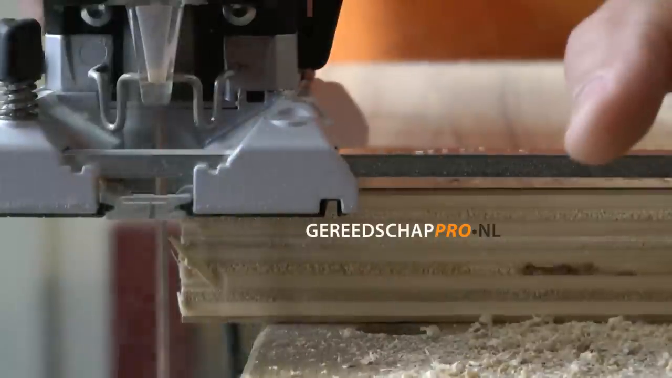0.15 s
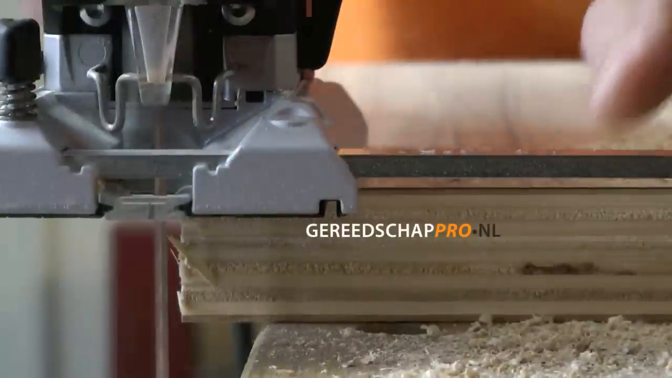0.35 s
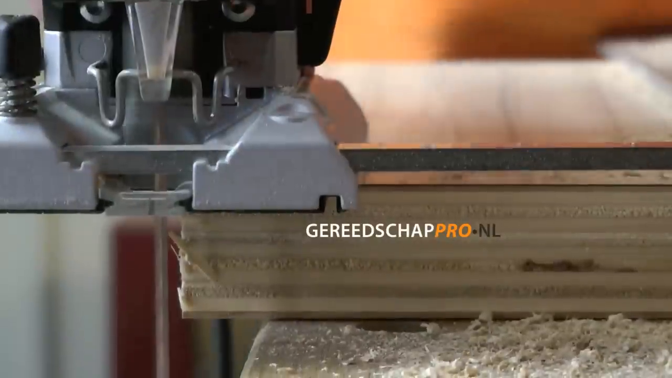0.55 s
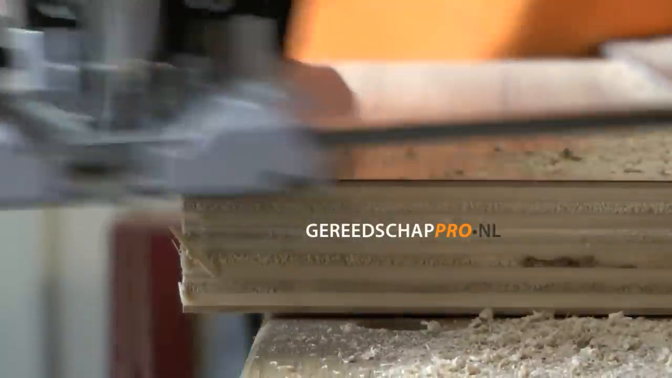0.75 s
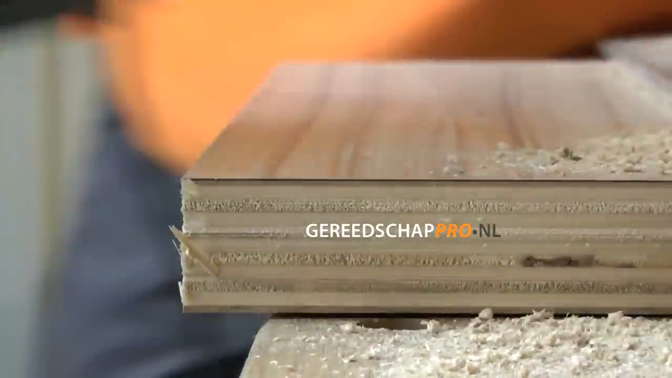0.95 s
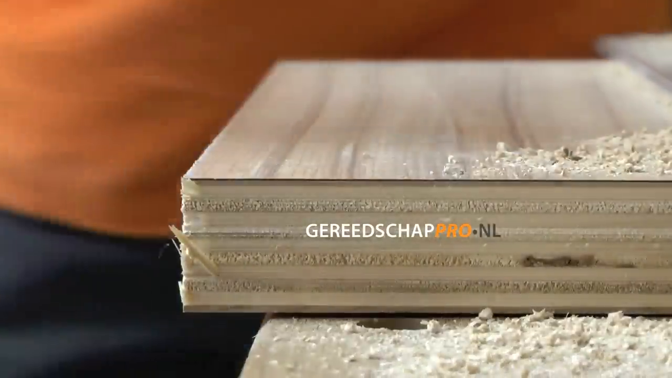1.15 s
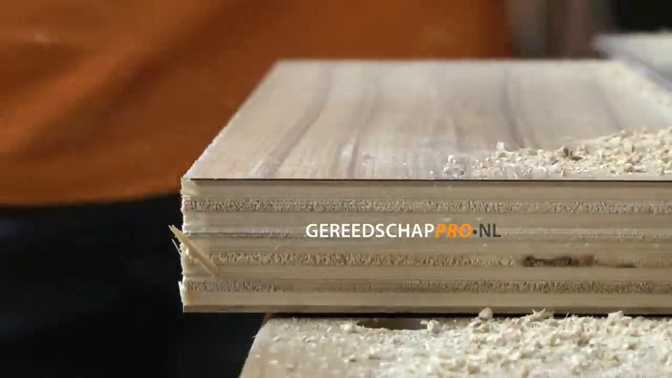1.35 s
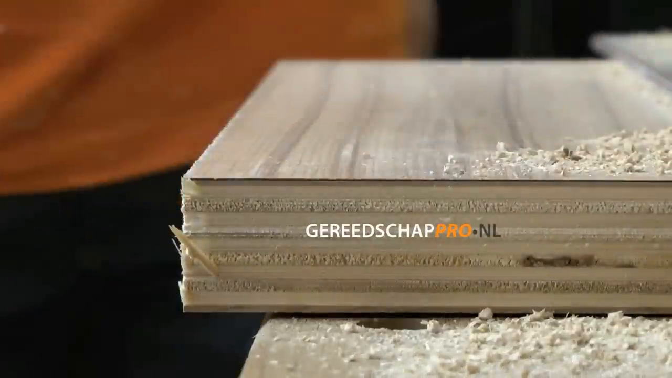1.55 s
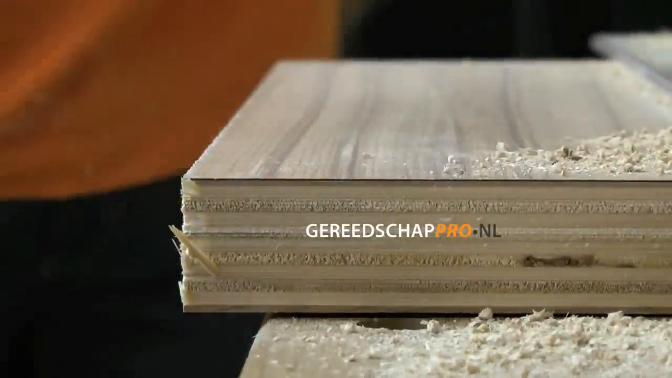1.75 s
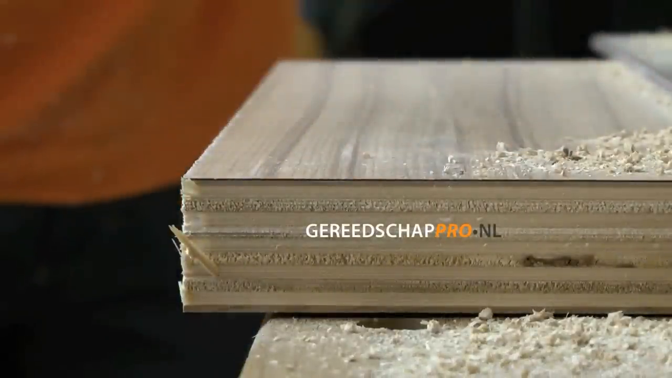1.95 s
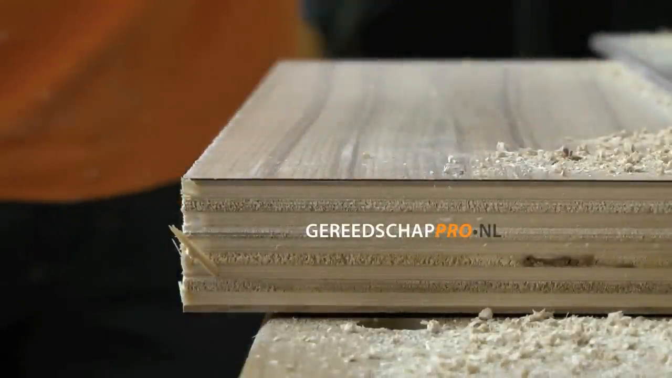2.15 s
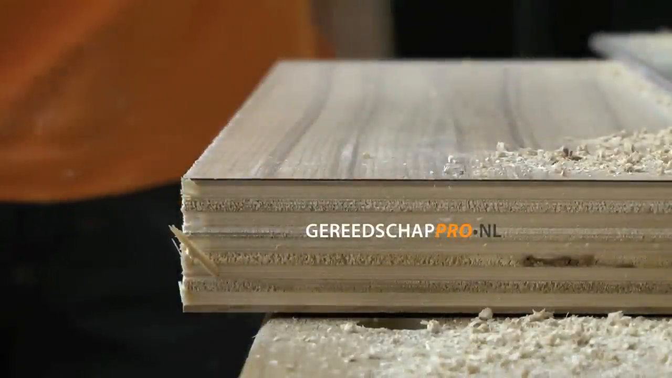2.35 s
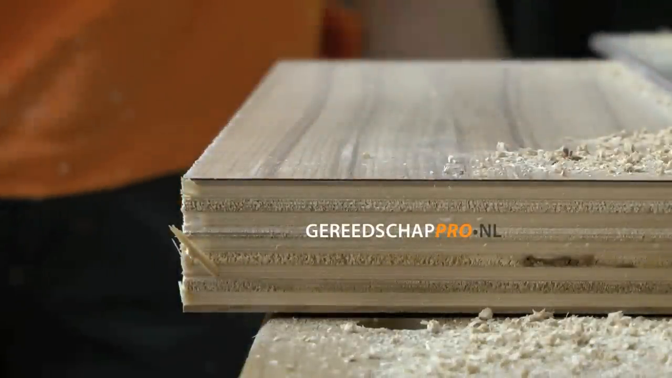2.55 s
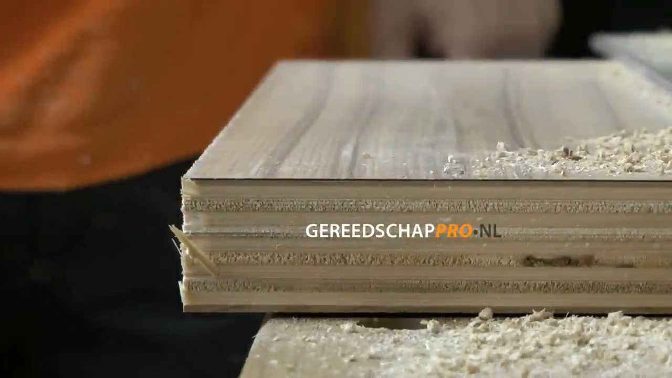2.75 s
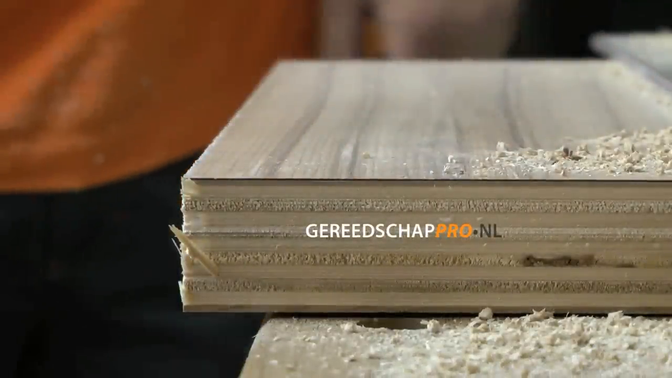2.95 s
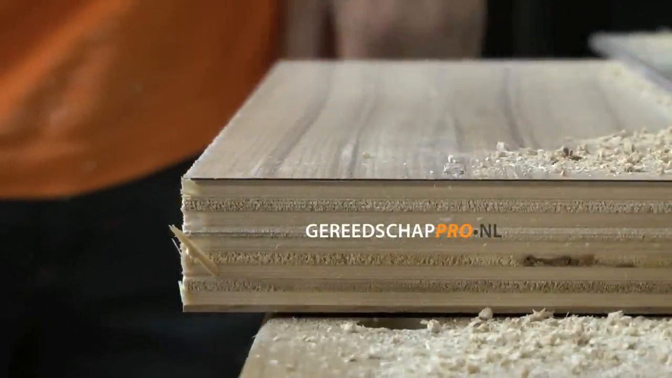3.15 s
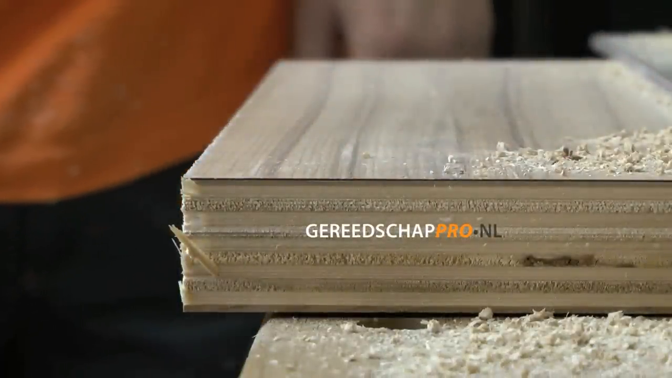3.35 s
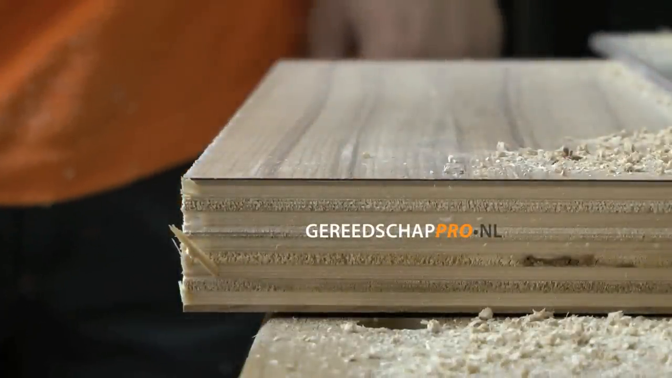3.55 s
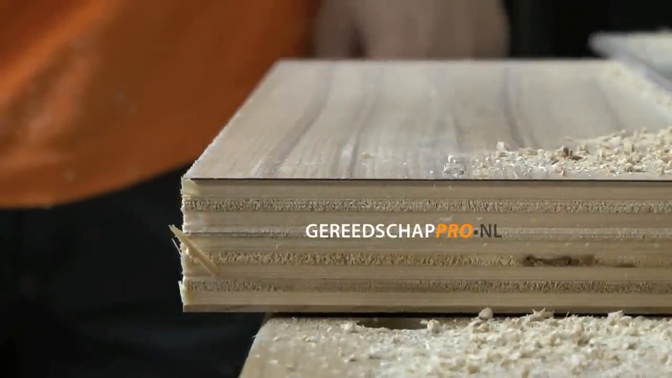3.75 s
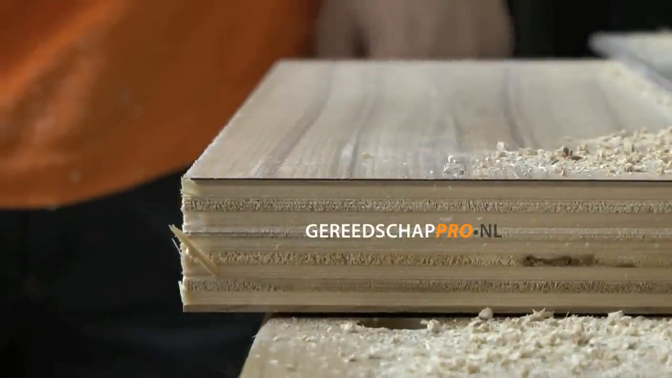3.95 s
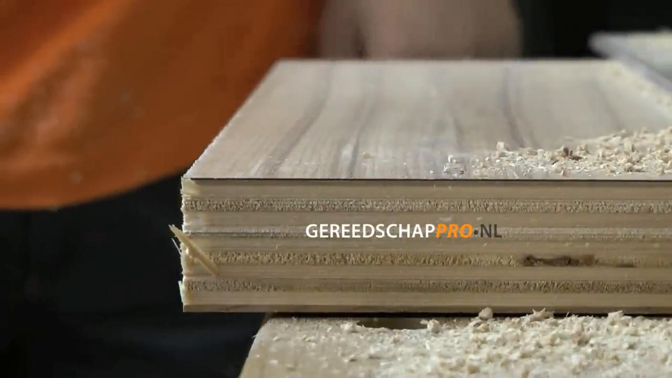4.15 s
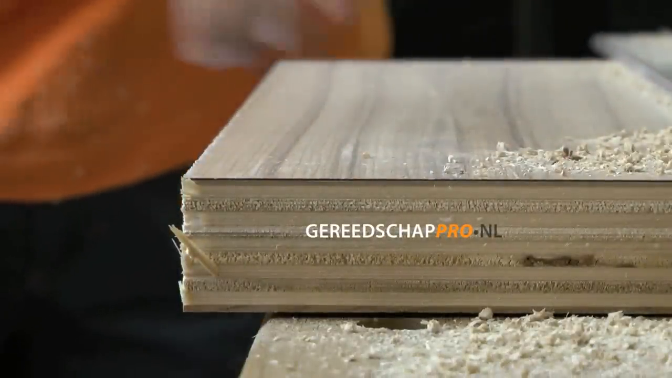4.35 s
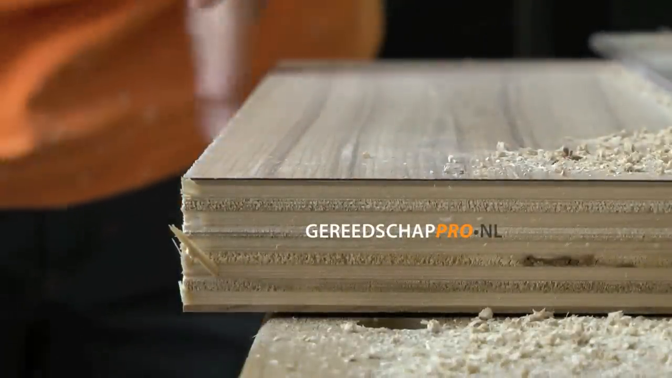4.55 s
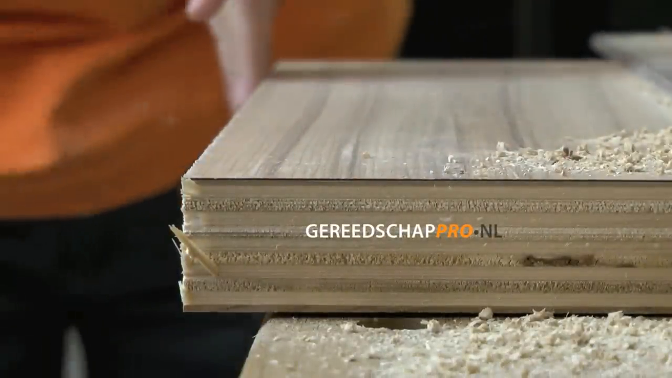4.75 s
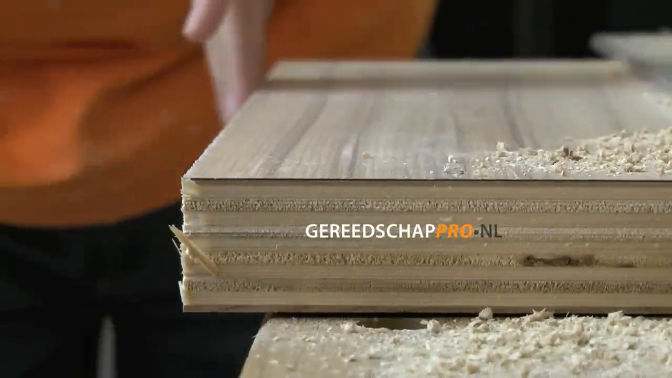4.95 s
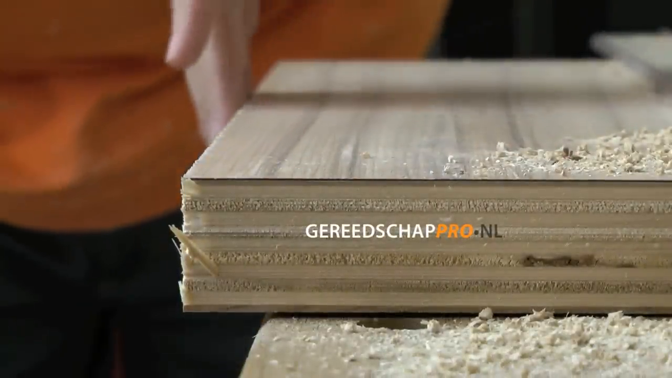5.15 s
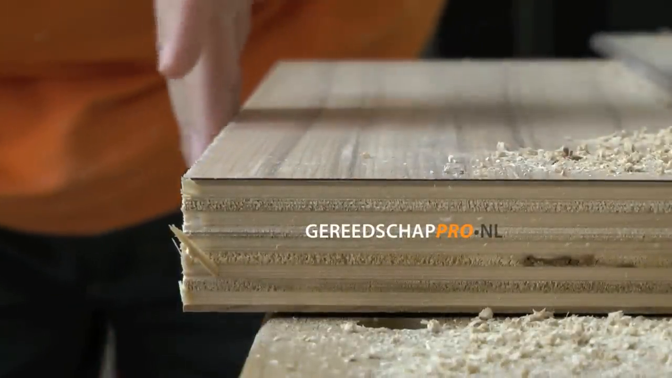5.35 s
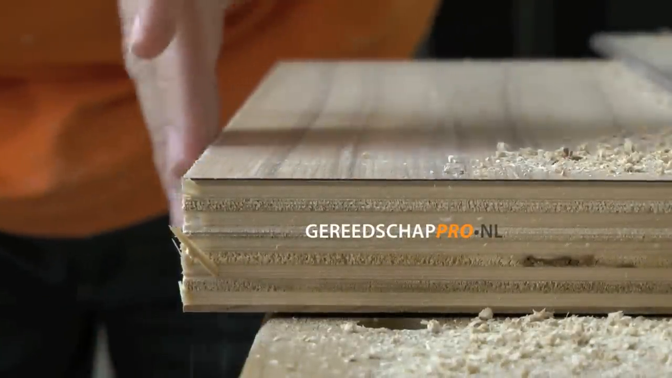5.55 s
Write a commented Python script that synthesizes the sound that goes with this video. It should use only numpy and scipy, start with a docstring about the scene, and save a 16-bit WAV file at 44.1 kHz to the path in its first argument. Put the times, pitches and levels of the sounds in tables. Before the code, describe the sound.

Close jigsaw cutting ends in a sharp clack, the motor coasts down in falling pitch, then quiet hum and soft hand rubbing on a board.

```python
"""A jigsaw, close up, tears out of a cut in thick plywood, knocks against the board and coasts to a stop.
Its gear whines as wandering tones, the blade rod rattles as noise surging twice a stroke, brushes hiss;
air drag and friction slow it, so pitch and level sink together. The knock is noise and struck modes.
It ducks the recorder's gain, which creeps back up over steady hum, rumble and hiss.
Late on, fingers slide over the board: dense tiny slips, shaped by the pressure of the hand."""
import sys
import numpy as np
from scipy import signal
from scipy.fft import rfft, irfft
from scipy.io import wavfile
from scipy.ndimage import uniform_filter1d

SR = 44100
rng = np.random.default_rng(int(sys.argv[2]) if len(sys.argv) > 2 else 0)


def master(y):
    """Save y as 16-bit WAV."""
    cut = np.clip(np.atleast_2d(y).T, -1, 1)
    pcm = np.round(cut * 32767)  # scale
    wavfile.write(sys.argv[1], SR, pcm.astype(np.int16))


N = 246959
TIME = np.arange(N) / SR  # s

# All source levels stand ahead of the room and the recorder's gain control.
# Run-down: strokes/s at the start, time constant of air drag in s, strokes/s lost each second to dry friction
FULL_SPEED, DRAG_S, FRICTION = 52.5, 1.78, 5.15
GEAR_TEETH = 52

# Tone of the torn fibres, relative: [f/Hz, level/dB]
CUT_COLOUR = [(100, -49.5), (250, -30.5), (380, -27.5), (460, -19.5), (700, -11), (1050, -8), (1400, -10),
              (2000, -12.5), (2500, -2), (3500, -9), (5200, -11), (7300, -18), (11000, -30), (15500, -45)]
# Resonances of board and shoe under the blade, added to that outline: [f/Hz, width/Hz, level/dB re outline]
BOARD_RING = [(448, 26, 11), (548, 15, -2), (866, 38, -1.5), (1130, 30, -1), (1828, 150, 3),
              (2320, 220, -10)]
CUT_DB, CUT_ENDS_S, CUT_RELEASE_DB_PER_S = -2, .35, 92.5

# Broad tone of the free-running saw, relative: [f/Hz, level/dB]
COAST_COLOUR = [(120, -34.5), (300, -19), (530, -13), (844, -7), (1100, -6.5), (1320, -8.5), (1600, -4),
                (2400, -0.5), (3300, -5), (4000, -7.5), (6600, -11), (9000, -20.5), (12000, -29.5),
                (13000, -35), (15500, -42.5)]
# Resonances of housing and gear case, added to that outline: [f/Hz, width/Hz, level/dB re outline]
HOUSING_RING = [(705, 50, -10), (915, 110, -4), (1190, 80, -2), (1640, 100, -3), (2130, 70, -4),
                (2400, 160, -9), (3100, 260, -5), (4600, 500, -9), (7000, 500, -10)]
# Rattle level at the starting speed, and its loss when the speed falls to a tenth
RATTLE_DB, RATTLE_DB_PER_DECADE = -4, 30
DRONE_DB, HISS_DB, SHAKE_DB = -9, -6, -26  # dB re rattle
HISS_DB_PER_DECADE = -0.5  # negative: the hiss gains slightly on the rattle as the speed falls
LAST_STROKE_S, SETTLE_S = 2.954, 0.3  # the shaking fades out over SETTLE_S from here

# How well the gear case radiates a tone, before the loss per harmonic: [f/Hz, level/dB re rattle]
WHINE_COLOUR = [(550, -22), (720, -9), (900, -7.5), (1130, -5.5), (1330, -20), (1640, -7.5), (1950, -6),
                (2450, -8), (3000, -16), (5000, -22)]
HARMONIC_DB = -6  # times the harmonic number, so the fundamental takes it once and the octave twice

# Resonances of board and housing as the slowing saw passes them: [t/s at the height, f/Hz, level/dB re rattle]
SWELLS = [(.15, 203, -39), (.61, 207, -29), (.63, 458, -28), (.71, 870, -13), (.81, 3200, -7),
          (1.95, 205, -30), (2.0, 335, -24), (2.684, 3200, -4), (2.93, 1700, -6), (3.06, 2120, -1)]
SWELL_HALF_S, SWELL_WIDTH = 0.093, .07  # half length to 1/e; flutter rate as a share of the frequency

# The saw knocks on the board: [t/s, crack level/dB, thump level/dB]
KNOCKS = [(0.3688, 7, -2), (0.372, 8, -21)]
# Tone of the crack, relative: [f/Hz, level/dB]
CRACK_COLOUR = [(200, -18), (900, -6.0), (1800, 12.0), (4000, 7.5),
                (7500, -4.5), (11000, -27.0), (15500, -14)]
# Modes of the steel shoe, nominal, re crack before its trim: [f/Hz, level/dB, t60/s]
SHOE_MODES = [(1850, -6, .05), (2850, -7, 0.39), (2756, -5.5, 0.24), (3080, -4.5, 0.038),
              (4910, -11, 0.031)]
# Modes of the thump, nominal, re thump: a deep sub-bass lobe, then the board's modes: [f/Hz, level/dB, t60/s]
THUMP_MODES = [(14, -3, 0.33), (118, -20.5, 0.33), (207, -8.5, 0.22), (282.6, -13.5, 0.11),
               (320, 0.5, 0.14), (447.7, -12.5, 0.18)]

# The slowing blade rod drops through its play, before the tick and tone trims: [t/s, level/dB]
CLACKS = [(2.4507, -25), (2.467, -18.5), (2.6418, -23), (3.0148, -29), (3.038, -38), (3.058, -37)]
# Modes of the rod, nominal, re clack: [f/Hz, level/dB, t60/s]
ROD_MODES = [(980, -6, 0.13), (1593, -1.5, 0.078), (1990, 10, 0.023), (2130, -6, 0.17), (2340, -20, 0.092),
             (2930, -3, 0.076), (3330, -17, .08)]
BOUNCE_S, BOUNCE_DB = .0063, -2.5  # each rebound of the rod: delay and level step

# Tone of skin on wood, relative: [f/Hz, level/dB]
RUB_COLOUR = [(260, -26), (450, -5.5), (600, -3), (780, -7), (950, -9), (1100, -5), (1500, -6), (2350, -2),
              (4000, -5), (6200, -7), (9000, -16), (14000, -23.5)]
# The hand slides over the board: [start t/s, length/s, level/dB at the start]
SLIDES = [(3.424, .24, -66.5), (4.011, .1, -72), (4.37, .2, -63.5), (4.64, 0.1, -51.5), (4.895, 0.68, -52)]
SLIDE_ATTACK_S, SLIDE_RELEASE_S, SLIDE_SAG_DB_PER_S = 0.11, 0.13, 6.5  # attack and release to 1/e
# A pressed fingertip scuffs the board: [t/s at the height, level/dB, friction resonance f/Hz]
SCUFFS = [(4.625, -56, 1700), (4.713, -51, 2490), (4.918, -52, 2544)]
SCUFF_HALF_S = 0.04  # half length to 1/e
# Fingers touch down: [t/s, level/dB, centre f/Hz]
TOUCHES = [(4.319, -55, 1270), (4.32, -61, 3990), (4.637, -46.5, 3800), (4.903, -49, 3700)]

# Mains and idling machines, each level wandering slightly: [f/Hz, rms level/dB]
HUM = [(50, -67.5), (70.4, -61), (93, -68), (95.5, -62), (150, -60.5), (200, -66.5), (250, -68),
       (281.3, -62.5), (300, -74.5), (329.3, -70.5), (450, -75), (550, -79.5), (755, -80), (850, -81),
       (1050, -80)]
# Tone of the faint steady hiss, relative: [f/Hz, level/dB]
AIR_COLOUR = [(250, -20), (400, -4.5), (800, -2), (1500, -2.5), (4000, -9.5), (15500, -12)]
AIR_DB, RUMBLE_DB = -65, -63.5

# Gain control: threshold, deepest cut, cut at the start, recovery rate, smoothing time
AGC_THRESHOLD_DB, AGC_RANGE_DB, AGC_START_DB = -10, 17, 16.5
AGC_RECOVERY_DB_PER_S, AGC_ATTACK_S = 17, 0.00404
TOP_HZ = 15750  # upper edge of the recorder's passband


def run_down():
    """Strokes per second of a motor braked by air drag and dry friction."""
    offset = FRICTION * DRAG_S
    return np.maximum((FULL_SPEED + offset) * np.exp(-TIME / DRAG_S) - offset, 1)


def strokes(turns, sharp, scatter_db, return_db):
    """A surge at each reversal of the blade; return strokes are weaker and sizes scatter."""
    half = (2 * turns).astype(int)
    scatter = scatter_db * rng.standard_normal(1024)[half]
    size = undb(scatter + return_db * (half % 2))
    return size * np.exp(-sharp * (2 * turns % 1))


def cutting(turns):
    """Teeth tear fibres in surges and ring the board, until the blade leaves the wood."""
    surge = 3.2 + strokes(turns, sharp=1.5, scatter_db=1.5, return_db=-0.5)
    tearing = (grains(9000, 1.6) + 0.75 * noise()) * surge
    level_db = CUT_DB - CUT_RELEASE_DB_PER_S * np.maximum(TIME - CUT_ENDS_S, 0)
    return unit(colour(tearing, CUT_COLOUR, BOARD_RING)) * undb(level_db)


def shaking(speed):
    """Strength of the saw's vibration: a power of its speed, until the rod settles."""
    moving = np.clip(1 - (TIME - LAST_STROKE_S) / SETTLE_S, 0, 1) ** 2
    return undb(RATTLE_DB + RATTLE_DB_PER_DECADE * np.log10(speed / FULL_SPEED)) * moving


def coasting(turns, speed):
    """Loose gear teeth and the blade rod rattle the housing; brushes hiss, duller as the motor slows."""
    surge = 1 + .9 * strokes(turns, sharp=2.5, scatter_db=1.5, return_db=-2)
    mesh = 1 + .5 * np.cos(2 * np.pi * GEAR_TEETH * turns)  # impacts bunch at each tooth
    impacts = unit((grains(8000, 2.6) + .8 * noise()) * surge * mesh)
    body = colour(impacts, COAST_COLOUR, HOUSING_RING)
    drone = unit(band(body, 480, 1364)) * undb(DRONE_DB)
    rattle = unit(band(body, 1330, 4000))
    shake = unit(band(body, 210, 544)) * undb(SHAKE_DB)

    brushes = colour(noise(), COAST_COLOUR, HOUSING_RING)  # they slide evenly, whatever the stroke
    bright_hiss = unit(band(body + 1.2 * brushes, 4000, 20000))
    soft_hiss = signal.sosfiltfilt(signal.butter(3, 9000, fs=SR, output="sos"), bright_hiss)
    dull = np.interp(speed, [3, 14], [.5, 0])
    hiss_db = HISS_DB + HISS_DB_PER_DECADE * np.log10(speed / FULL_SPEED)
    hiss = ((1 - dull) * bright_hiss + dull * soft_hiss) * undb(hiss_db)

    free = np.clip((TIME - CUT_ENDS_S) / .08, 0, 1)  # the blade is out of the wood
    return (drone + rattle + hiss + shake) * free


def whine(turns, speed):
    """Gear mesh and octave sink through case resonances; backlash spreads them, strokes wobble them."""
    phase = 2 * np.pi * GEAR_TEETH * turns + 0.7 * np.sin(4 * np.pi * turns)
    hz, db = np.transpose(WHINE_COLOUR)
    out = np.zeros(N)
    for k in (1, 2):
        tone_hz = k * GEAR_TEETH * speed
        radiated_db = np.interp(np.log(tone_hz), np.log(hz), db) + k * HARMONIC_DB
        out += flutter(k * phase, width_hz=130, steady=1.4) * undb(radiated_db)
    return out


def swells():
    """Resonances swell briefly as the shaking sweeps past them."""
    out = np.zeros(N)
    for s, hz, db in SWELLS:
        tone = flutter(2 * np.pi * hz * TIME, SWELL_WIDTH * hz, steady=0.63)
        out += undb(db) * bump(s, SWELL_HALF_S) * tone
    return out


def knocks():
    """The steel shoe cracks against the board and rings; the board thumps."""
    burst = sum(undb(db) * fade(s, 0.034) for s, db, _ in KNOCKS)
    crack = unit(colour(noise(), CRACK_COLOUR)) * burst
    shoe = undb(-5.5) * strike([(s, db) for s, db, _ in KNOCKS], SHOE_MODES)
    sizzle = unit(band(noise(), 3100, 8200)) * undb(4.5) * fade(KNOCKS[0][0], 0.19)
    thump = strike([(s, db) for s, _, db in KNOCKS], THUMP_MODES)
    return crack + shoe + sizzle + thump


def clacks(count=3):
    """The rod's metallic knocks in the last slow strokes, each with quick, weaker rebounds."""
    blows = [(s + k * BOUNCE_S, db + k * BOUNCE_DB) for s, db in CLACKS for k in range(count)]
    burst = sum(undb(db) * fade(s, 0.029) for s, db in blows)
    tick = unit(band(noise(), 640, 3100)) * burst
    tone = undb(-13) * strike(blows, ROD_MODES)
    return band(tone + undb(-6.5) * tick, 750, 9600)


def pressure(start, length):
    """One slide of the hand: it presses, slowly eases and lifts."""
    age = TIME - start
    edges = np.minimum(age, 0) / SLIDE_ATTACK_S - np.maximum(age - length, 0) / SLIDE_RELEASE_S
    return np.exp(edges) * undb(-SLIDE_SAG_DB_PER_S * np.clip(age, 0, length))


def hand():
    """Skin catches on dusty wood in tiny slips; a pressed fingertip scuffs; landings tick."""
    slips = grains(4000, 3.9) + 0.62 * noise()
    # where slides overlap, the stronger one is heard
    press = np.max([undb(db) * pressure(s, length) for s, length, db in SLIDES], axis=0)
    out = unit(colour(slips, RUB_COLOUR)) * press
    for s, db, hz in SCUFFS:
        scuff = flutter(2 * np.pi * hz * TIME, width_hz=1700, steady=0)
        out += scuff * undb(db) * bump(s, SCUFF_HALF_S)
    for s, db, hz in TOUCHES:
        out += unit(ring(slips, hz, 0.14 * hz)) * undb(db) * fade(s, 0.07)
    return out


def room(x, wet_db, t60):
    """Short diffuse echo of bench and walls: a decaying noise tail."""
    tail = (band(noise(), 230, 7000, order=1) * fade(0.0027, t60))[:SR]
    tail = tail / np.sqrt(np.sum(tail ** 2))
    return x + undb(wet_db) * signal.fftconvolve(x, tail)[:N]


def workshop():
    """Steady hum of sine tones over a low noise rumble and faint hiss."""
    hum = np.zeros(N)
    for hz, db in HUM:
        tone = np.sqrt(2) * np.sin(2 * np.pi * (hz * TIME + rng.random()))
        hum += undb(db + 0.35 * walk(3)) * tone
    rumble = unit(band(noise(), 60, 290)) * undb(RUMBLE_DB)
    air = unit(colour(noise(), AIR_COLOUR)) * undb(AIR_DB)
    return hum + rumble + air


def undb(db):
    """Decibels to gain."""
    return 10 ** (np.asarray(db) / 20)


def unit(x):
    """Scale to rms 1."""
    return x / np.sqrt(np.mean(x ** 2))


def noise():
    """White noise."""
    return rng.standard_normal(N)


def walk(rate):
    """Random wander: straight lines between rate new values a second, spread near 1."""
    steps = rng.standard_normal(16384)
    return np.interp(TIME * rate, np.arange(len(steps)), steps)


def grains(rate, spread_db):
    """Dense random impacts, about rate a second, of uneven size and either sign; rms 1."""
    hits = rng.random(N) < rate / SR
    return unit(hits * rng.choice([-1, 1], N) * undb(spread_db * noise()))


def flutter(phase, width_hz, steady):
    """A tone whose strength and phase wander, spreading it into a band; rms 1."""
    wander = steady + walk(width_hz) + 1j * walk(width_hz)
    return unit(np.real(wander * np.exp(1j * phase)))


def strike(blows, modes):
    """Blows (t/s, level/dB) ring a set of decaying modes, slightly detuned each time."""
    out, t = np.zeros(N), TIME[:SR // 2]
    for s, blow_db in blows:
        detune = 1 + 0.017 * rng.standard_normal(len(modes))
        start = int(s * SR)
        for (hz, db, t60), k in zip(modes, detune):
            decay = np.exp(-np.log(1000) * t / t60)
            out[start:start + len(t)] += undb(db + blow_db) * np.sin(2 * np.pi * hz * k * t) * decay
    return out


def fade(start, t60):
    """Exponential decay from a given moment."""
    age = TIME - start
    return (age >= 0) * np.exp(-np.log(1000) * np.clip(age / t60, 0, 10))


def bump(s, half):
    """Smooth rise and fall around a moment."""
    return np.exp(-((TIME - s) / half) ** 2)


def band(x, lo_hz, hi_hz, order=3):
    """Band-pass."""
    edges = [lo_hz, min(hi_hz, SR / 2 - 1)]
    return signal.sosfilt(signal.butter(order, edges, "band", fs=SR, output="sos"), x)


def ring(x, hz, width):
    """One resonance, gain 1 at its centre."""
    return signal.lfilter(*signal.iirpeak(hz, hz / width, fs=SR), x)


def colour(x, points, peaks=(), size=8192):
    """Minimum-phase filter: a broad (f/Hz, level/dB) outline with resonances standing on it."""
    f = np.maximum(np.arange(size // 2 + 1) * SR / size, 1)
    hz, db = np.transpose(points)
    gain = undb(np.interp(np.log(f), np.log(hz), db))
    gain = gain * (1 + sum(undb(d) / (1 + (2 * (f - c) / w) ** 2) for c, w, d in peaks))
    cepstrum = irfft(np.log(gain))[:size // 2]
    cepstrum[1:] *= 2  # folding the cepstrum makes the filter causal
    return signal.fftconvolve(x, irfft(np.exp(rfft(cepstrum, size))))[:N]


def gain_control(x, size=128):
    """Peaks over the threshold turn the gain down fast; it creeps back at a steady rate."""
    level_db = 10 * np.log10(np.abs(uniform_filter1d(x ** 2, size)) + 1e-12)
    asked_db = np.clip(level_db - AGC_THRESHOLD_DB, 0, AGC_RANGE_DB)
    recovery_db = AGC_RECOVERY_DB_PER_S * TIME
    held_db = np.maximum.accumulate(np.maximum(asked_db + recovery_db, AGC_START_DB), axis=-1)
    cut_db = held_db - recovery_db
    pole = np.exp(-1 / (AGC_ATTACK_S * SR))
    # smoothing works on the distance from the starting cut, so it begins settled
    smooth_db = signal.lfilter([1 - pole], [1, -pole], cut_db - AGC_START_DB)
    return x * undb(-AGC_START_DB - smooth_db)


def scene():
    """One shaft drives cut, rattle and whine; saw and hand sound in the room, over the workshop."""
    speed = run_down()
    turns = np.cumsum(speed * (1 + .004 * walk(30))) / SR  # the speed is slightly uneven
    running = shaking(speed) * (coasting(turns, speed) + whine(turns, speed) + swells())
    saw = cutting(turns) + running + knocks() + clacks()
    return (room(saw + hand(), wet_db=-10, t60=0.41) + workshop())[None]


def record(dry):
    """The recorder rides its gain, rounds the highest peaks and cuts the top."""
    rounded = 1.115 * np.tanh(gain_control(dry) / 1.216)
    return signal.sosfilt(signal.ellip(10, .2, 80, TOP_HZ, fs=SR, output="sos"), rounded)


dry = scene()
out = record(dry)
master(out)
```